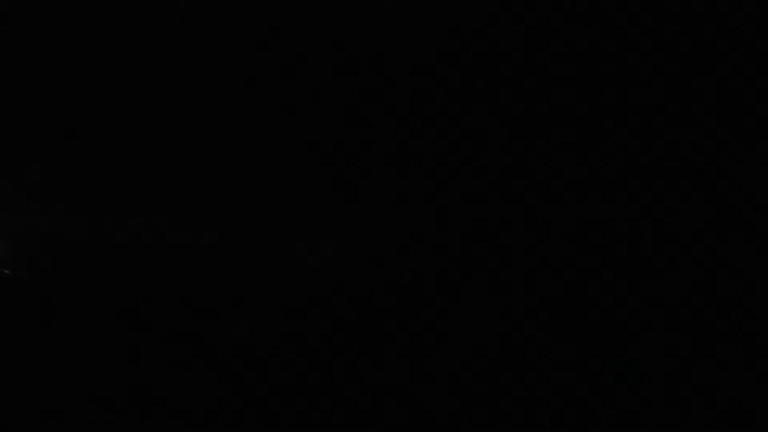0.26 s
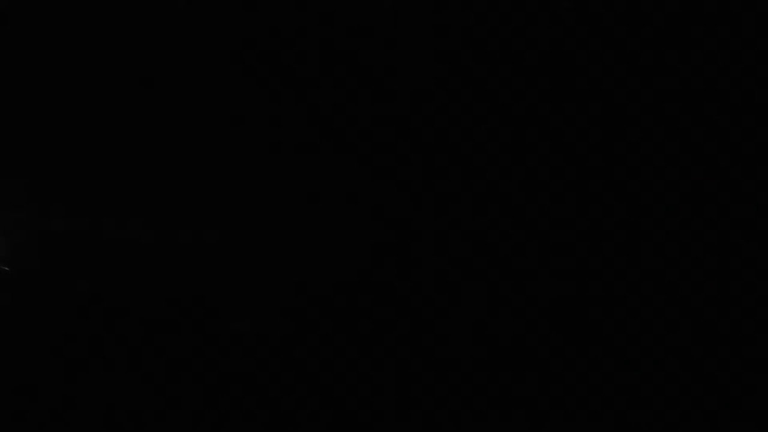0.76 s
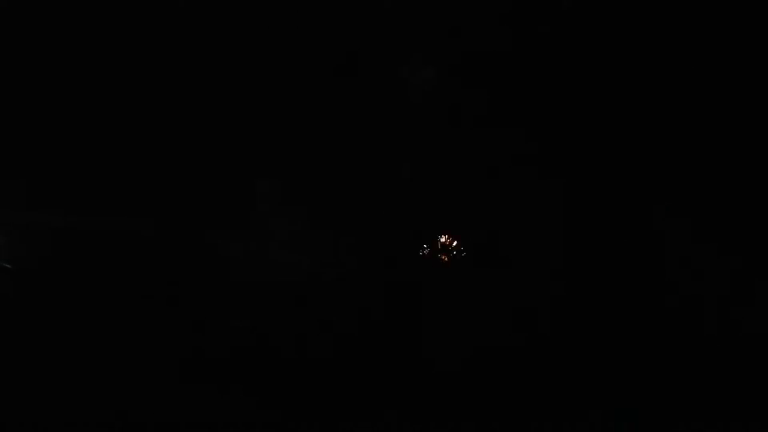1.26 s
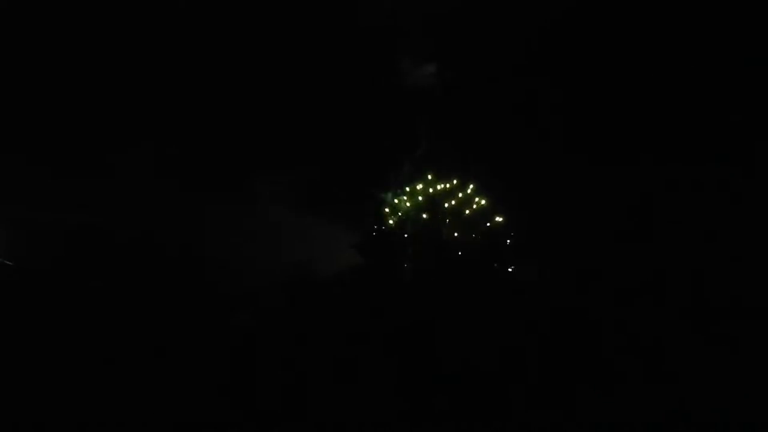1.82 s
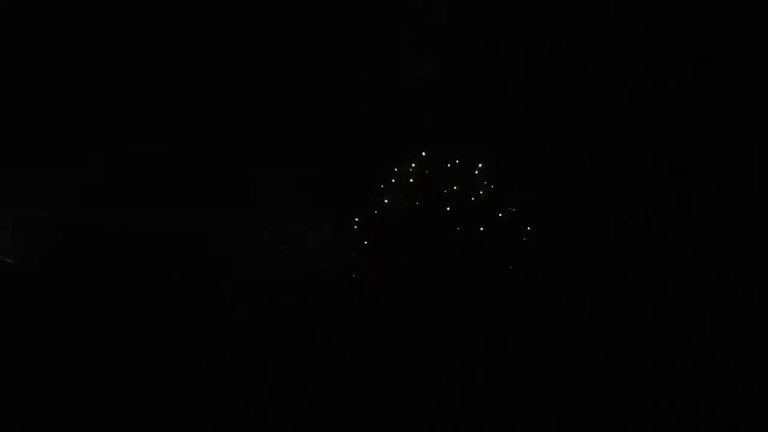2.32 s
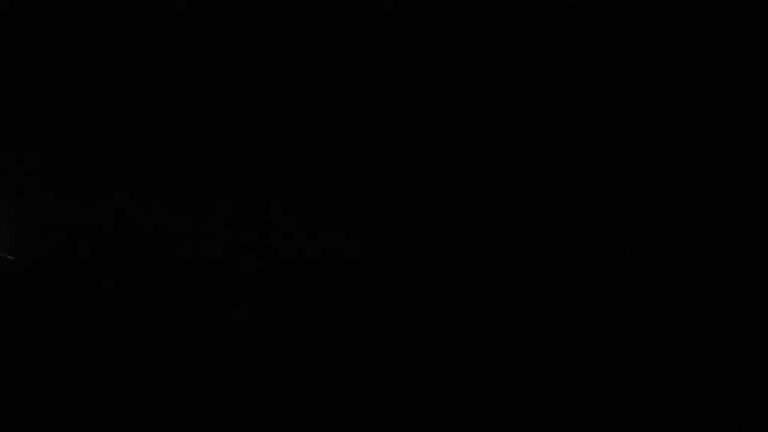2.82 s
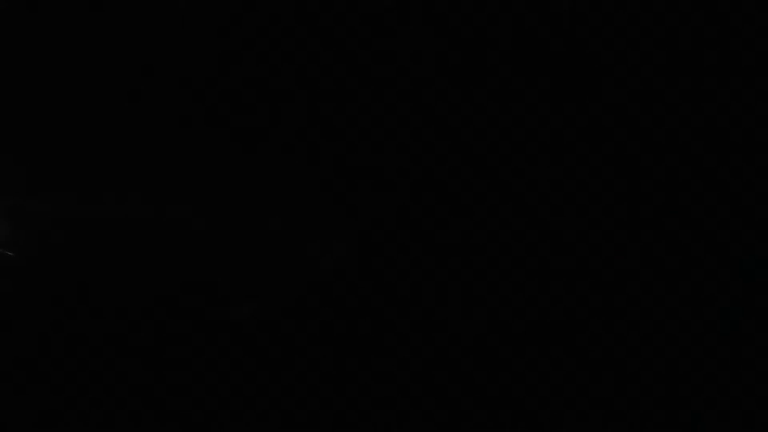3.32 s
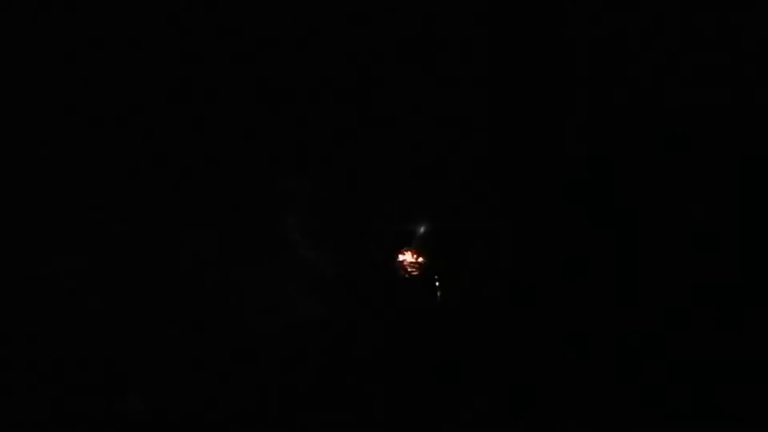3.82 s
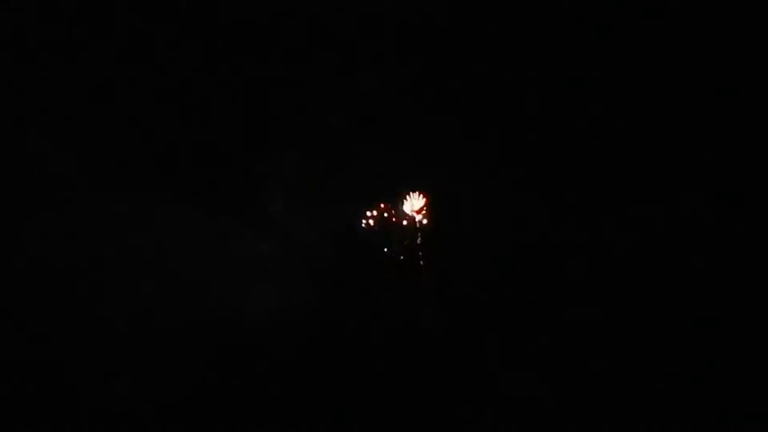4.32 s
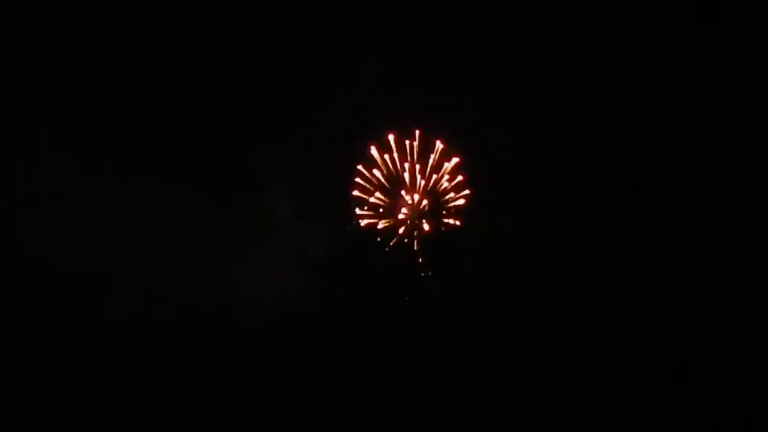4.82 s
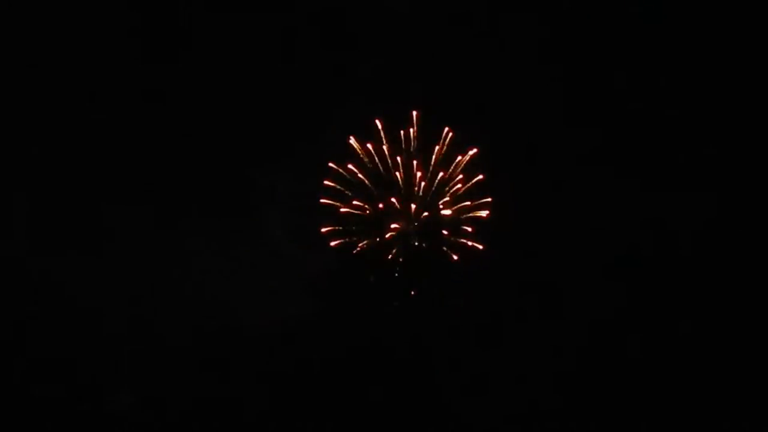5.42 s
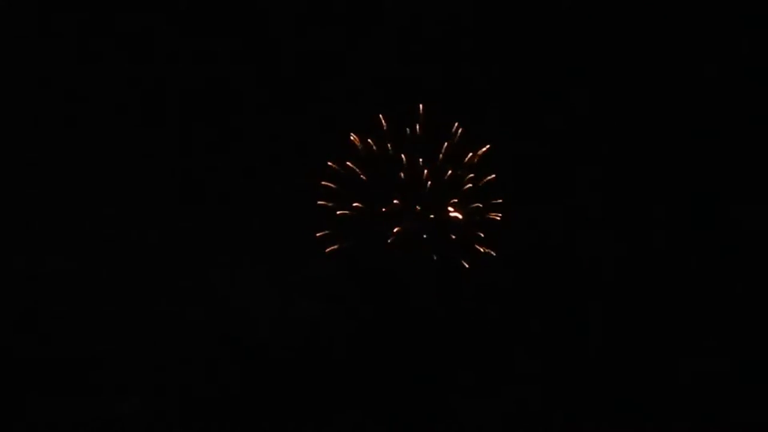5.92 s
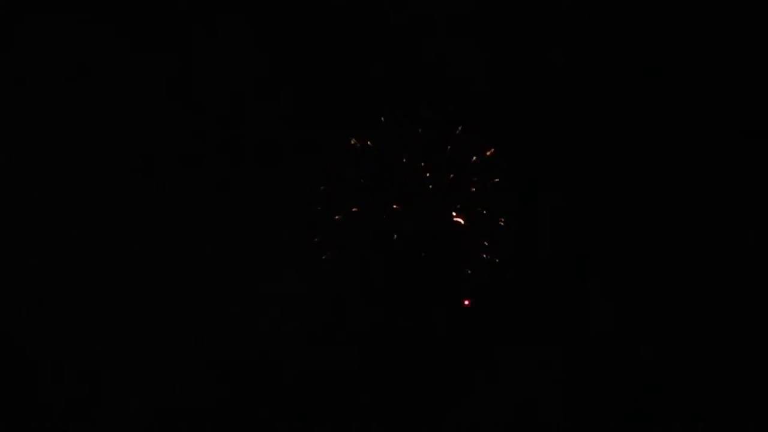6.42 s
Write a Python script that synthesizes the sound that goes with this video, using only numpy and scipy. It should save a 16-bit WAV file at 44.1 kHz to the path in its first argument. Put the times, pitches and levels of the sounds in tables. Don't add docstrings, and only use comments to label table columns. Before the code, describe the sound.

A rapid barrage of far-off firework booms with short echoes and a deep rumble, faint insects and hiss showing in the gaps.

```python
import sys
import numpy as np
from scipy import signal
from scipy.fft import rfft, irfft
from scipy.io import wavfile
from scipy.ndimage import uniform_filter1d

SR = 44100
rng = np.random.default_rng(int(sys.argv[2]) if len(sys.argv) > 2 else 0)


def wav_out(sig):
    wavfile.write(sys.argv[1], SR, np.round(np.clip(np.atleast_2d(sig).T, -1, 1) * 32767).astype(np.int16))


def volts_from_db(level):
    exponent = np.asarray(level, float) / 20
    return 10 ** exponent


N = 293706

# (time [s], level [dB])
BARRAGE = [(0.0, -36), (0.55, -40), (0.75, -34), (1.7, -40), (1.9, -37), (2.25, -41), (3.1, -36),
           (3.45, -38.5), (4.45, -39), (5.05, -36), (5.9, -38.5), (6.66, -40.5)]
# (frequency [Hz], level [dB per Hz])
RUMBLE_COLOUR = [(15, -52.5), (25, -21.5), (98, -3.5), (215, 2), (268, -5.5), (328, -4), (401, -9.5),
                 (552, -6.5), (860, -16.5), (1120, -13), (1290, -18.5), (1960, -22.5), (3050, -38),
                 (3960, -85), (6710, -120)]
TAIL_COLOUR = [(60, -33), (120, -0.5), (210, 0.5), (330, 0.5), (600, -15.5), (1000, -20), (2000, -26),
               (3000, -43.5)]
SLAP_COLOUR = [(100, -29), (220, -8), (500, 1), (930, -4), (1300, -12.5), (2000, -17), (3000, -36)]
HISS_COLOUR = [(1500, -1.5), (3000, 5.5), (5500, -0.5), (7500, -4), (11000, -9), (16000, -12)]
# (frequency [Hz], level [dB per Hz])
DEEP_COLOUR = [(20, -4.5), (36, -22.5), (52, 4), (75, 0.0), (110, -21.5), (160, -43.5)]
INSECT_COLOUR = [(3000, -21), (3500, -13.0), (4300, 1.5), (4750, -1.5), (4950, -8.5), (5150, -29.5)]
# (frequency [Hz], width [Hz], level [dB])
CRACK_TONES = [(593, 49.4, 1.5), (1099, 150, -0.5), (1450, 111, -4), (1950, 220, -6.5)]
# (delay [s], level [dB], time to fall 60 dB [s])
SCATTER = [
    (0.009, -5.5, 0.09),
    (0.06, -3.5, 0.037),
    (0.071, -9.5, 0.097),
]
# (delay [s], level over tail [dB], time to fall 60 dB [s])
HILL_ECHO = (.1, -9, 0.061)
# (delay [s], level [dB], half length [s])
HILL_BOOM = (.103, -19.5, 0.00881)
# (time [s], pitch [Hz], level [dB])
HOOT = [
    (5.335, 410, -46),
    (5.355, 430, -34),
    (5.375, 440, -31),
    (5.41, 440, -31),
    (5.425, 430, -42),
]
# (time [s], peak [dB], crack over boom [dB], wall slap over return [dB], bright snap [dB])
NEAR_SHELLS = [(0.059, -4, -17, -7, -53), (0.581, -11, -17, -11.5, -67), (0.688, -4, -11.5, -18.5, -44.5),
               (0.982, -1.5, -16, -8.5, -48), (1.807, -5, -11.5, -13, -44.5), (2.645, 0, -18, -12, -38.5),
               (2.942, -4.5, -14, -13, -45), (3.082, -2, -14, -8, -41.5), (3.669, -4.5, -16.5, -27, -59),
               (3.712, -10.5, -15.5, -16.5, -62), (4.285, -2, -16.5, -36, -37),
               (4.34, -1.5, -16.5, -18, -40.5), (4.418, -11, -13, -14, -49), (4.576, -6, -14, -10, -48.5),
               (4.74, -20.5, -12, -9, -40.5), (5.129, -12.5, -9.5, -9.5, -56.5),
               (5.426, -2, -13.5, -19, -30.5), (5.494, -10.5, -12.5, -15.5, -53.5),
               (5.821, -3.5, -12, -16, -51), (6.163, -2, -13.5, -19, -29.5), (6.338, -18.5, -11, -5, -63)]
# (time [s], peak [dB], crack over boom [dB])
FAR_SHELLS = [(0.074, -8, -21), (0.276, -27, -11.5), (0.464, -31, -5), (0.592, -18, -23.5),
              (0.627, -22, -13), (0.668, -11.5, -23.5), (4.258, -33.5, -7), (1.279, -23, -10.5),
              (1.409, -17, -25.5), (1.621, -31, -17), (2.005, -15, -27.5), (2.233, -20, -24.5),
              (2.278, -25.5, -10), (2.495, -24, -10), (2.567, -21, -22.5), (3.417, -43, -20),
              (3.843, -27.5, -10), (4.789, -20, -13), (5.045, -22.5, -27.5), (5.166, -14, -24),
              (6.085, -23.5, -13.5), (6.28, -34, -8.5), (5.675, -24, -12.5)]
# (time [s], level [dB])
MORTARS = [
    (0.07, -33.5),
    (4.728, -47),
    (5.121, -50),
    (6.33, -38),
]
# (time [s], depth [dB])
TURN_DOWN = (3.466, 14.46)
# (start [s], end [s], depth [dB])
GAIN_DIPS = [(2.655, 3.0, 3.5), (3.466, 3.645, 26.5), (3.645, 3.715, 9.5), (3.715, 4.35, 14),
             (4.352, 4.4, 11), (4.4, 4.465, 7.5), (4.465, 4.565, 10.5), (4.6, 4.72, 6), (4.8, 5.1, 5),
             (5.433, 5.82, 12), (6.172, 6.255, 8.5), (6.255, 6.315, 11), (6.425, 6.7, 6)]
# (time [s], level [dB])
CHIRPS = [
    (3.638, -63),
    (4.01, -56.5),
    (4.313, -58),
    (4.415, -62),
    (4.454, -62),
    (4.765, -55),
    (5.367, -58),
]


def rms_one(x):
    return x / np.sqrt(np.mean(x ** 2) + 1e-20)


def in_time(rows):
    s, *columns = np.transpose(rows)
    return [np.interp(np.arange(N) / SR, s, column) for column in columns]


def drift(rate_hz):
    r = np.exp(-80 * np.pi * rate_hz / SR)
    slow = signal.lfilter([1], [1, -2 * r, r * r], rng.standard_normal(N // 40 + 2002))
    slow = slow[2000:]
    return np.interp(np.arange(N) / 40, np.arange(len(slow)), rms_one(slow))


def shaped(x, colour):
    hz, level_db = np.transpose(colour)
    bins = np.maximum(np.arange(N // 2 + 1) * SR / N, 1)
    gain_db = np.interp(np.log(bins), np.log(hz), level_db, left=-60, right=-70)
    return irfft(rfft(x) * volts_from_db(gain_db), N)


def wide_noise(colour, side_db):
    mid, side = shaped(rng.standard_normal((2, N)), colour)
    return (mid + volts_from_db(side_db) * side * [[1], [-1]]) / np.std(mid)


def resonance(x, hz, width_hz):
    r = np.exp(-np.pi * width_hz / SR)
    ringing = [1, -2 * r * np.cos(2 * np.pi * hz / SR), r * r]
    return signal.lfilter([(1 - r * r) / 2, 0, (r * r - 1) / 2], ringing, x)


def fading(s, level_db, rise_s, t60):
    power = np.full(N, 1e-14)
    np.add.at(power, np.clip((s * SR).astype(int), 0, N - 1), volts_from_db(2 * level_db))
    fall, rise = volts_from_db(-120 / (t60 * SR)), np.exp(-1 / (rise_s * SR))
    power = signal.lfilter([1], [1, -fall], power)
    return np.sqrt(signal.lfilter([1 - rise], [1, -rise], power))


def shells():
    far_slap_db = -9.5
    rows = [row[:4] for row in NEAR_SHELLS] + [(*row, far_slap_db) for row in FAR_SHELLS]
    s, peak_db, crack_db, slap_db = np.transpose(rows)
    return_db = peak_db + 2 + .6 * np.minimum(0, crack_db + 9.5)
    return s, peak_db, crack_db, return_db, slap_db


def dips(rows):
    recover_db_per_s, fall_s = 17.5, .004
    t = np.arange(N) / SR
    depth_db = 0
    for s, end, db in rows:
        active = (t >= s) & (t < end)
        depth_db = depth_db + active * np.maximum(db - recover_db_per_s * (t - s), 0)
    return -uniform_filter1d(depth_db, int(fall_s * SR))


def gated(x, gain_db):
    threshold_db, spread_db, left_db = -15.5, 4, -30
    hz, s, cells = signal.stft(x, SR, nperseg=2048)
    strength_db = np.interp(hz, *np.transpose(HISS_COLOUR))[:, None]
    over_db = strength_db + np.interp(s * SR, np.arange(N), gain_db) - threshold_db
    luck = rng.standard_normal((len(hz) // 4 + 1, len(s)))
    luck = np.repeat(luck, 4, axis=0)[:len(hz)]
    kept = over_db + spread_db / 2 * luck > 0
    return signal.istft(cells * np.where(kept, 1, volts_from_db(left_db)), SR, nperseg=2048)[1][:, :N]


def hiss(gain_db):
    noise = gated(rms_one(shaped(rng.standard_normal((2, N)), HISS_COLOUR)), gain_db)
    floor = volts_from_db(-94) * rng.standard_normal((2, N))
    return noise * volts_from_db(-62 + gain_db + 0.58 * drift(2.5)) + floor


def insect_chorus(gain_db):
    chorus = rms_one(shaped(rng.standard_normal((2, N)), INSECT_COLOUR))
    throb_db = 1.1 * drift(4.6) + 2.0 * drift(25)
    level_db = -68.5 + 0.45 * gain_db
    return chorus * volts_from_db(level_db + throb_db + [[4.0], [2.0]])


def chirps():
    pitch_hz, length_s = 4700, 0.0024
    t = np.arange(N) / SR
    shape = sum(volts_from_db(db) * np.exp(-.5 * ((t - s) / length_s) ** 2) for s, db in CHIRPS)
    buzz = resonance(rng.standard_normal((2, N)), pitch_hz, 600)
    return shape * rms_one(resonance(buzz, pitch_hz, 600))


def hoot():
    before, after = (HOOT[0][0] - .01, 400, -120), (HOOT[-1][0] + .01, 400, -120)
    hz, level_db = in_time([before, *HOOT, after])
    return volts_from_db(level_db) * np.sin(2 * np.pi * np.cumsum(hz) / SR)


def night():
    gain_db = dips(GAIN_DIPS)
    return insect_chorus(gain_db) + chirps() + hiss(gain_db) + hoot()


def far_thuds():
    hits = rng.random(N) < 45.0 / SR
    strength = volts_from_db(1.3 * np.minimum(rng.exponential(1, N), 4)) * rng.choice([-1, 1], N)
    thuds = resonance(hits * strength + 1e-18, 220, 70)
    return rms_one(resonance(thuds, 140, 130))


def deep_roll(cut_db):
    s, peak_db, *_ = shells()
    swell = volts_from_db(-54.5 + cut_db + 1.6 * drift(2.5))
    swell = swell + fading(s, peak_db - 42.5, 0.0045, 0.34)
    swell = swell + fading(*np.transpose(MORTARS), .02, .6)
    return swell * wide_noise(DEEP_COLOUR, -15.5)


def rumble():
    body_db, = in_time(BARRAGE)
    cut_db = dips([(TURN_DOWN[0], N / SR, TURN_DOWN[1])])
    noise, patches, shared = wide_noise(RUMBLE_COLOUR, -21.5), 0, drift(1.8)
    edges_hz = [80, 300, 800, 1600, 4000]
    for low, high in zip(edges_hz, edges_hz[1:]):
        band = signal.sosfilt(signal.butter(2, [low, high], "band", fs=SR, output="sos"), noise)
        flicker = volts_from_db(.8 * shared + 1.1 * drift(20))
        patches = band * flicker - patches
    return volts_from_db(body_db + cut_db) * (patches + volts_from_db(-9.5) * far_thuds()) + deep_roll(cut_db)


def echoes():
    at, _, _, return_db, slap_db = shells()
    tail_db = -19.5
    tail = fading(at + .015, return_db + tail_db, .004, .28)
    tail = tail + fading(at + 0.055, return_db - 38.5, 0.0039, 0.11)
    slaps = sum(fading(at + s, return_db + slap_db + db - 3.5, 0.0006, t60) for s, db, t60 in SCATTER)
    hill_delay_s, hill_db, hill_t60 = HILL_ECHO
    hill = fading(at + hill_delay_s, return_db + tail_db + hill_db, 0.0069, hill_t60)
    dull = resonance(rng.standard_normal(N), 200, 73)
    dull = rms_one(resonance(dull, 140, 130))
    lumps = volts_from_db(1.2 * np.clip(drift(46), -2, 1.5))
    scatter = wide_noise(TAIL_COLOUR, -34)
    scatter = scatter / (uniform_filter1d(scatter[0] ** 2, int(.012 * SR)) + .1) ** (.5 / 2)
    return lumps * tail * scatter + slaps * wide_noise(SLAP_COLOUR, -20.5) + hill * dull


def snaps():
    s, *_, snap_db = np.transpose(NEAR_SHELLS)
    fall = volts_from_db(-60 / (.016 * SR))
    out = 0
    for level_db, band_hz in [(snap_db - 7.0, [2500, 5000]), (snap_db - 19.5, [5000, 16000])]:
        clicks = np.zeros(N)
        clicks[((s + .003) * SR).astype(int)] = volts_from_db(level_db)
        band = signal.butter(3, band_hz, "band", fs=SR, output="sos")
        noise = signal.sosfilt(band, rng.standard_normal((2, N)))
        noise = rms_one(noise[0] + 0.18 * noise[1] * [[1], [-1]])
        out = out + signal.lfilter([1], [1, -fall], clicks + 1e-18) * noise
    return out


def shock_pulses(t, front_s):
    width_ms, bounce_s, bounce_db = 0.54, .00369, -9.0
    pulses = [(front_s, 0), (front_s + bounce_s, bounce_db)]
    return sum(volts_from_db(db) * np.exp(-.5 * ((t - at) * 1000 / width_ms) ** 2) for at, db in pulses)


def boom_ring(since, hz, crack_db):
    rise_s = max(-17 - crack_db, .01) * 0.83 / 1000
    late = np.maximum(since - rise_s, 0)
    fall_db = -60 * late / 0.057 - 9 * (late / .015) ** 4
    return np.sin(2 * np.pi * hz * since) * np.minimum(since / rise_s, 1) * volts_from_db(fall_db)


def crack_ring(t, splinters):
    grit = splinters * (t / .001) * np.exp(-t * 1000 / 2.03)
    crack = sum((-1) ** k * volts_from_db(db) * resonance(grit, hz, width_hz)
                for k, (hz, width_hz, db) in enumerate(CRACK_TONES))
    return crack / np.abs(crack).max()


def blasts():
    out, t = np.zeros(N + SR), np.arange(4000) / SR
    splinters = rng.standard_normal((len(NEAR_SHELLS) + len(FAR_SHELLS), 4000)) ** 3
    pitches_hz = 197 * (1 + 0.025 * rng.standard_normal(len(splinters)))
    front_s, wall_delay_s = .002, .0575
    hill_delay_s, hill_db, hill_half_s = HILL_BOOM
    shocks = shock_pulses(t, front_s)
    since = np.maximum(t - front_s - .0004, 0)
    for s, peak_db, crack_db, return_db, slap_db, hz, grit in zip(*shells(), pitches_hz, splinters):
        sharp = crack_ring(t, grit) * volts_from_db(crack_db + 7.5)
        sharp = sharp - volts_from_db(-2.5 + min(0, crack_db + 13.5)) * shocks
        start = round(s * SR)
        out[start:start + len(t)] += volts_from_db(peak_db) * (volts_from_db(-.5) * boom_ring(since, hz, crack_db) + sharp)
        hill = start + round((hill_delay_s - 2 * hill_half_s) * SR)
        softened = np.sin(2 * np.pi * hz * t) * np.exp(-(t / hill_half_s - 2) ** 2)
        out[hill:hill + len(t)] += volts_from_db(return_db + hill_db) * softened
        wall = start + round(wall_delay_s * SR)
        out[wall:wall + len(t)] += volts_from_db(return_db + slap_db + 4.5) * resonance(sharp, 750, 500)
    return out[:N]


def scene():
    far = signal.sosfilt(signal.butter(1, 90, "high", fs=SR, output="sos"), blasts())
    far = signal.sosfilt(signal.butter(4, 2300, fs=SR, output="sos"), far)
    late = signal.sosfilt(signal.butter(4, 3000, fs=SR, output="sos"), echoes())
    left, right = far + snaps() + late + rumble()
    left = left - .4 * resonance(left, 2400, 1100)
    return np.array([volts_from_db(-.3) * np.roll(left, 1), volts_from_db(.3) * right]) + night()


def top_cut(x):
    return signal.sosfilt(signal.butter(12, 15900, fs=SR, output="sos"), x)


def record(dry):
    x = signal.lfilter(*signal.iirnotch(3200, 9.0, fs=SR), dry)
    knee, room = .7, .25
    rounded = np.sign(x) * (knee + room * np.tanh((np.abs(x) - knee) / room))
    mix = np.where(np.abs(x) > knee, rounded, x)
    return top_cut(mix)


dry = scene()
out = record(dry)
wav_out(out)
```